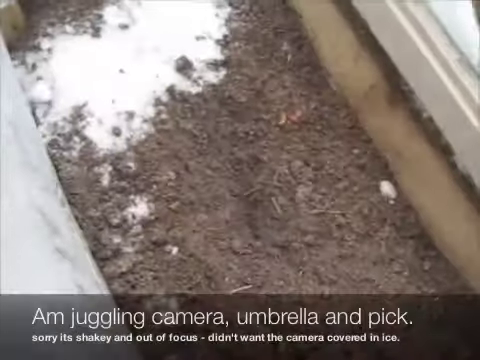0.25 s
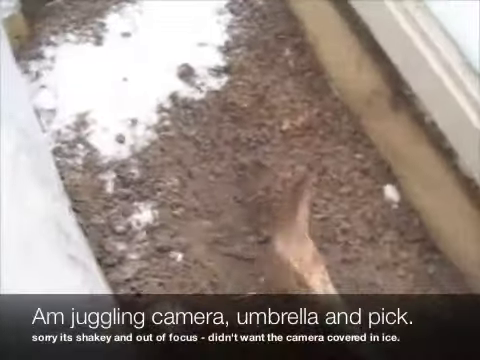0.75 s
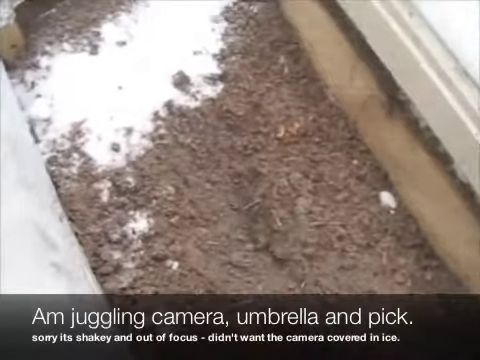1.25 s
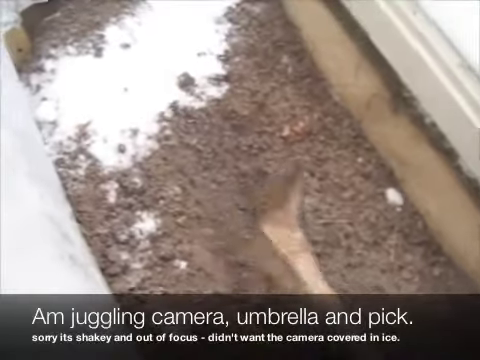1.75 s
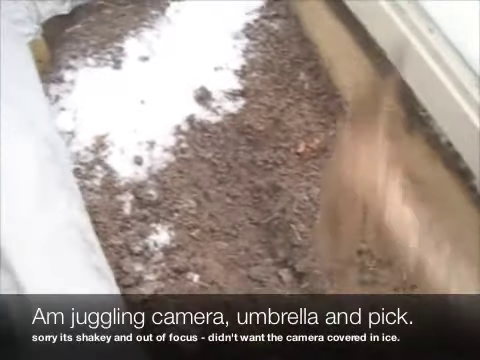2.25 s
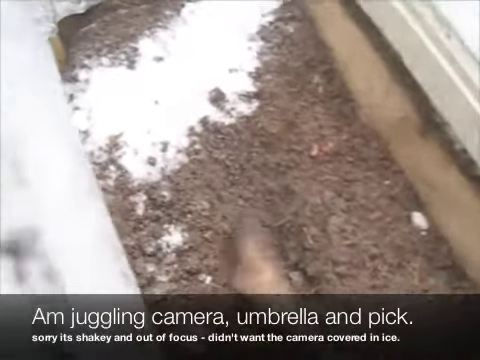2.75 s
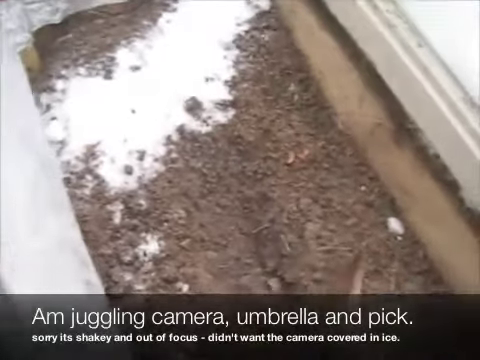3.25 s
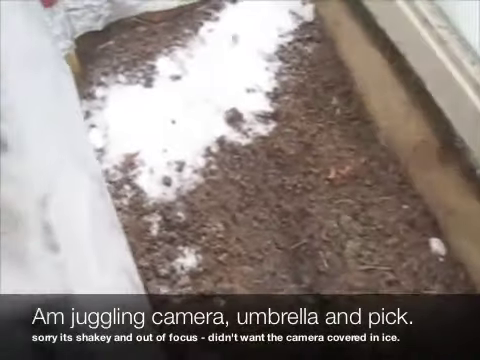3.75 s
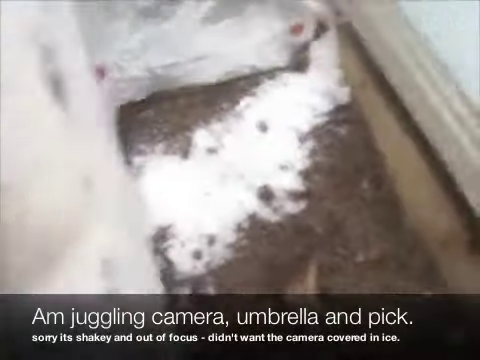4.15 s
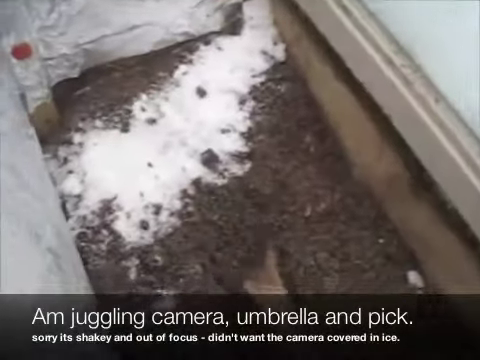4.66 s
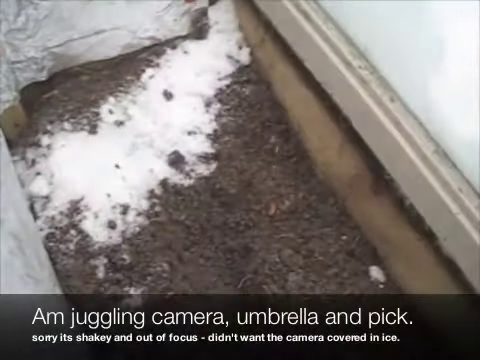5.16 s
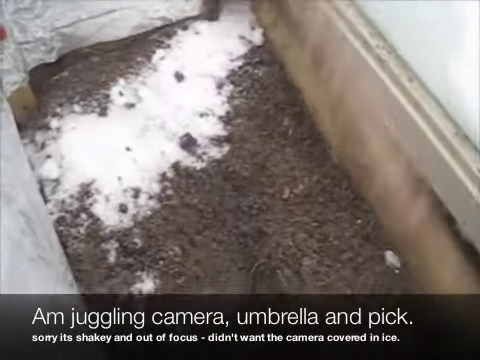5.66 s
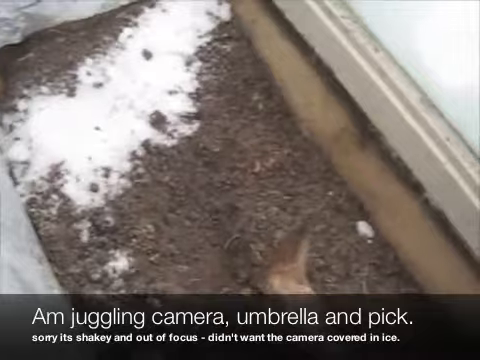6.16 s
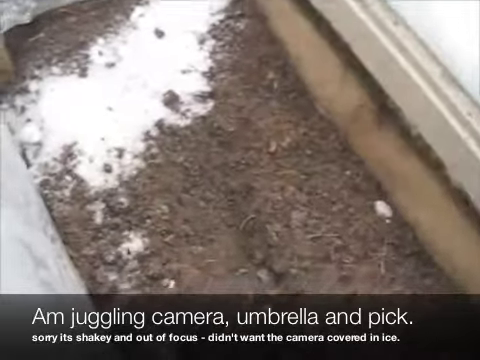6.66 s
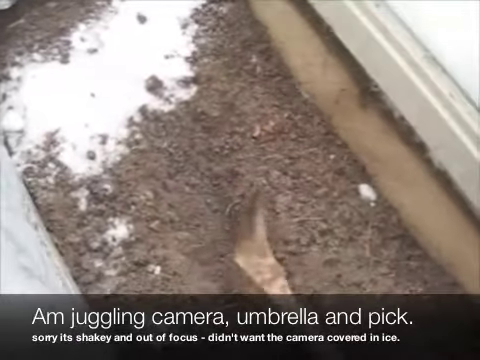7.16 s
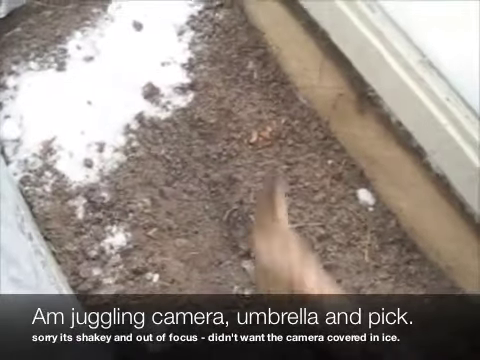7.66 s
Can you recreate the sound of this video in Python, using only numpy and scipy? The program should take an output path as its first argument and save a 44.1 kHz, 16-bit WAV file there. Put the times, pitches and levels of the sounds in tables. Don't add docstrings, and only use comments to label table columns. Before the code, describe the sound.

Outdoors in a garden bed, dense sleet ticks and pops on taut umbrella fabric just above a small handheld camera. A steel pick hits frozen soil six times, each a sharp crack with a brief dull ring and thump. Between blows the blade pries and scrapes through grit, and thrown clods rattle on sheeting. The patter drops after hard hits, then recovers.

```python
import sys
import numpy as np
from scipy import signal
from scipy.fft import rfft, irfft
from scipy.io import wavfile
from scipy.ndimage import map_coordinates

SR = 44100
rng = np.random.default_rng(int(sys.argv[2]) if len(sys.argv) > 2 else 0)


def master(y):
    cut = np.clip(np.atleast_2d(y).T, -1, 1)
    pcm = np.round(cut * 32767)
    wavfile.write(sys.argv[1], SR, pcm.astype(np.int16))


def to_linear_factor(level_db):
    exponent = np.asarray(level_db, float) / 20
    return 10 ** exponent


N = 348831

# pitch_hz, level_db, t60_s (time to fade by 60 dB)
STEEL = [(2830, 0, .03), (3600, -3, .025), (5950, -12, .025), (7600, -11, .02), (9870, -10, .025)]
# pitch_hz, level_db, t60_s
HEAD = [(1450, -1, .085), (4290, -7, .08), (6000, -10, .055)]
# frequency_hz, level_db (per Hz)
CRACK = [(350, -25), (600, 6.5), (2720, 7.5), (3690, 6.5), (5010, 0.5), (5830, 5), (13400, -11.5),
         (16500, -42)]


def unit(x):
    return x / np.sqrt(np.mean(x ** 2) + 1e-20)


def curves(rows):
    times, *columns = np.transpose(rows)
    t = np.arange(N) / SR
    return [np.interp(t, times, column, left=-150, right=-150) for column in columns]


def swell(s, db, rise, hold, fall):
    held = s + hold
    return to_linear_factor(curves([(s - rise, db - 25), (s, db), (held, db), (held + fall, db - 25)])[0])


def coloured(x, spectrum, keep_level=False):
    f, db = np.transpose(spectrum)
    hz = np.fft.rfftfreq(4096, 1 / SR)
    gain = to_linear_factor(np.interp(np.log(hz + 1), np.log(f), db))
    cepstrum = irfft(np.log(gain + 1e-5))
    cepstrum[1:2048] *= 2
    cepstrum[2049:] = 0
    response = irfft(np.exp(rfft(cepstrum)))
    if not keep_level:
        response = response / np.linalg.norm(response)
    return signal.oaconvolve(x, response)[:len(x)]


def add(track, s, sound):
    part = track[round(s * SR):][:len(sound)]
    part += sound[:len(part)]


def burst(t60, rise, parts=6, bend=1):
    t = np.arange(SR // parts) / SR
    fade = to_linear_factor(-60 * (t / t60) ** bend)
    return rng.standard_normal(len(t)) * fade * (1 - np.exp(-t / rise))


def ringing(modes, spread_db):
    t = np.arange(SR // 6) / SR
    rise_s = 0.00043
    out = np.zeros(len(t))
    for hz, db, t60 in modes:
        strength_db = db + spread_db * rng.normal()
        out += to_linear_factor(strength_db - 60 * t / t60) * np.sin(2 * np.pi * hz * t)
    return (1 - np.exp(-t / rise_s)) * out


def sparse(rate, spread_db):
    chance, size = rng.random((2, N))
    return (chance < rate / SR) * to_linear_factor(-spread_db * np.log(size + .02))


def rumble():
    # peak_s, level_db
    jolts = [
        (.62, -67),
        (1.81, -60.5),
        (2.7, -57.5),
        (3.01, -67),
        (3.96, -40.5),
        (4.76, -49),
        (6.9, -57),
    ]
    # frequency_hz, level_db (per Hz)
    sway_colour = [(12, -41), (20, 5), (160, -0.5), (210, -51), (350, -120)]
    level = to_linear_factor(-75)
    for s, db in jolts:
        level = level + swell(s, db, rise=0.052, hold=0, fall=0.11)
    return level * unit(coloured(rng.standard_normal(N), sway_colour))


def sleet_db():
    # time_s, level_db
    fall = [(0, -47.5), (.2, -57.5), (.55, -48.5), (1.4, -53.5), (2.1, -52.5), (2.6, -48.5), (3.2, -44.5),
            (3.9, -46.5), (4.45, -49), (4.89, -44.5), (5.77, -49.5), (6.63, -48.5), (7.2, -42.5),
            (7.91, -45)]
    # start_s, depth_db
    ducks = [
        (.457, 7.5),
        (1.479, 15),
        (2.681, 10.5),
        (5.791, 17.5),
        (6.884, 7.5),
    ]
    attack_s, recover_s = 0.021, 0.77
    starts, depths = np.array(ducks)[:, :1], np.array(ducks)[:, 1:]
    since = np.maximum(np.arange(N) / SR - starts, 0)
    dips = depths * (1 - np.exp(-since / attack_s)) * np.exp(-since / recover_s)
    return curves(fall)[0], dips.sum(axis=0)


def pellet(size):
    t = np.arange(SR // 16) / SR
    dent = np.exp(-((t - .0004) / (0.0001 * size)) ** 2)
    rebound = np.exp(-((t - .0004 - 0.00057 * size) / (0.00024 * size)) ** 2)
    push = 0.9 * rebound - dent
    echoes = rng.standard_normal(len(t)) * to_linear_factor(-60 * (t / 0.041) ** 1.39)
    echoes *= np.clip(t / 0.0015 - 1, 0, 1)
    return push + np.convolve(0.23 * echoes / np.linalg.norm(push), push[:100])[:len(t)]


def patter():
    # frequency_hz, level_db (per Hz)
    fabric = [(71, -33), (120, -21.5), (529, 2), (735, -3.5), (1710, -1), (2190, -9), (3380, -6),
              (14300, -25.5), (15500, -39), (16500, -60.5)]
    # frequency_hz, level_db (per Hz)
    far_colour = [(240, -7), (941, -16.5), (1530, -7.5), (4400, -10.5), (15000, -21.5), (15700, -34),
                  (16500, -61.5)]
    fall_db, dip_db = sleet_db()
    drops_db = fall_db - dip_db
    hiss_db = -56.5 + 0.79 * (fall_db - fall_db.mean()) - 0.87 * dip_db

    pushes, ticks = np.zeros(N), np.zeros(N)
    for _ in range(10):
        hits = sparse(rate=20, spread_db=1.9)
        size = 0.72 * np.exp(0.34 * rng.normal())
        pushes += signal.oaconvolve(hits, pellet(size))[:N]
        ticks += hits * rng.random(N)
    tick_fade = to_linear_factor(-60 * np.arange(SR // 16) / SR / 0.022)
    ticks = signal.oaconvolve(ticks, tick_fade)[:N]
    ticks = unit(coloured(ticks * rng.standard_normal(N), fabric))
    hiss = coloured(rng.standard_normal(N), far_colour)
    drops = to_linear_factor(-1.0) * unit(pushes) + to_linear_factor(-1.0) * ticks
    return to_linear_factor(drops_db) * drops + to_linear_factor(hiss_db + 3.0) * hiss


def near_sleet(*kinds):
    hard_above_db = -13
    low, soft, hard = np.zeros((3, N))
    for drops, tick_db in kinds:
        ticks = hard if tick_db > hard_above_db else soft
        for s, db in drops:
            add(low, s, to_linear_factor(db + 3.5) * pellet(size=np.exp(0.15 * rng.normal())))
            t60 = 0.039 * np.exp(0.32 * rng.normal())
            tick = burst(t60, rise=0.0013, parts=10, bend=1.416)
            add(ticks, s, to_linear_factor(db + tick_db + 6.5) * tick)
    soft = coloured(soft, [(800, -1.5), (1600, 8.0), (3500, 5.5), (6000, 0.0), (16000, -21.5)])
    hard = coloured(hard, [(800, 2.0), (1800, 12), (4000, 7.0), (7500, 1.0), (16000, -18.5)])
    return low + soft + hard


def soil():
    # start_s, peak_db, centre_hz, t60_s
    rattles = [(0.933, -38, 8000, 0.021), (.782, -38, 5030, 0.022), (1.54, -43.5, 6000, 0.046),
               (1.617, -47, 6000, 0.16), (1.656, -44, 6440, 0.12), (0.6714, -37, 4090, 0.036),
               (0.7, -34, 4290, 0.02), (0.734, -41.5, 3620, 0.14), (1.6795, -34, 3600, 0.16),
               (1.73, -28, 2900, 0.083), (2.799, -32.5, 2900, 0.068), (3.159, -26, 4900, 0.017),
               (3.885, -26, 6450, 0.068), (4.095, -27, 6100, 0.088), (4.1086, -19, 5100, 0.062),
               (4.14, -21, 4420, 0.054), (4.153, -16.5, 3120, 0.022), (4.2097, -28, 5270, 0.034),
               (4.2383, -23, 4340, 0.025), (4.264, -22, 3970, 0.087), (4.2928, -19.5, 5250, 0.018),
               (4.3259, -30.5, 3430, 0.13), (4.44, -30, 4500, 0.062), (4.5747, -29.5, 3930, 0.046),
               (4.9562, -26.5, 3106, 0.056), (5.089, -31.5, 4200, 0.11), (5.543, -35, 3600, 0.038),
               (6.4197, -33.5, 2958, 0.046), (7.256, -23, 6500, 0.039),
               (5.543, -26, 15000, 0.046), (5.978, -47, 8900, .04), (6.015, -37.5, 7400, 0.033),
                 (6.189, -38, 6000, 0.024), (3.959, -27, 4600, 0.079), (.107, -37, 9000, 0.021),
                 (0.23, -39.5, 9400, .03), (.605, -43, 7200, .04), (1.003, -39, 8300, 0.028),
                 (1.45, -40, 9000, 0.032), (2.239, -42, 11000, 0.042), (3.08, -34, 11900, 0.017),
                 (4.4078, -31.5, 11000, .012), (3.57, -43, 13000, 0.06), (3.55, -31, 5500, 0.054),
                 (4.063, -41, 9000, 0.039), (4.382, -28.5, 9000, 0.026), (4.704, -39, 9500, .03),
                 (5.061, -33, 7300, 0.049), (0.46, -13, 10000, 0.018), (7.024, -30, 5000, .04),
                 (7.045, -26, 4500, 0.069), (7.08, -33, 6000, .05), (7.113, -22.5, 3200, 0.063),
                 (7.219, -41, 6900, 0.045), (7.282, -30.5, 7100, 0.043), (5.7913, -12, 13500, 0.018),
                 (7.545, -34, 7100, 0.023), (1.4783, -11, 11000, .014), (8, -37, 9000, 0.037)]
    # full_level_s, level_db, rise_s, hold_s, fall_s
    showers = [
        (4.136, -40, .016, 0.028, 0.38),
        (6.996, -34.5, 0.0047, 0.13, 0.32),
    ]
    # frequency_hz, level_db (per Hz)
    grit = [(350, -101), (600, -16), (1630, -2.5), (2470, 1), (9220, -5), (15200, -15), (15800, -24),
            (16500, -57)]
    # frequency_hz, level_db
    sheet = [(9000, 0), (16000, -8.5)]
    lumps = np.zeros(N)
    for s, db, hz, t60 in rattles:
        colour = [(hz / 20.0, -24), (hz / 1.9, -4), (hz, 0), (hz * 2.17, -8), (hz * 6, -16)]
        add(lumps, s, to_linear_factor(db - 3.0) * coloured(burst(t60, rise=0.0012), colour))
    level = sum(swell(*row) for row in showers)
    grain_fade = to_linear_factor(-60 * np.arange(SR // 16) / SR / 0.031)
    grains = signal.oaconvolve(sparse(rate=2200, spread_db=3), grain_fade)[:N]
    shower = level * unit(coloured(grains * rng.standard_normal(N), grit))
    return coloured(lumps, sheet, keep_level=True) + shower


def scrape():
    # peak_s, level_db, rise_s, fall_s, dulling_db_per_khz
    strokes = [
        (.672, -58, 0.01, 0.066, 4),
        (1.828, -46.5, 0.065, 0.0069, -0.4),
        (2.996, -45.5, 0.013, 0.02, 0),
        (4.751, -41, 0.085, 0.0095, 1.5),
        (4.978, -46, 0.021, 0.043, -2),
        (6.107, -58, 0.081, 0.017, 0.5),
    ]
    out = np.zeros(N)
    for s, db, rise, fall, dull in strokes:
        grains = sparse(rate=1200, spread_db=5) * rng.standard_normal(N)
        slips = swell(s, db, rise, 0, fall) * unit(grains)
        modes = [(hz, level - dull * hz / 1000, t60) for hz, level, t60 in STEEL]
        blade = ringing(modes, spread_db=2) + to_linear_factor(-19) * ringing(HEAD, spread_db=4)
        out += signal.oaconvolve(slips, blade / np.linalg.norm(blade))[:N]
        crunch = coloured(burst(0.013, rise=0.00012)[:SR // 40] / 8, CRACK)
        add(out, 0, to_linear_factor(1) * signal.oaconvolve(slips, crunch))
    return to_linear_factor(10.5) * out


def ground(low_t60, mid_t60):
    low_colour = [(50, -14.5), (110, 7.5), (170, -6.0), (300, -37), (3000, -73.0)]
    mid_colour = [(90, -18.0), (180, -5), (450, -11.0), (900, -32.5), (5000, -58)]
    low = coloured(burst(low_t60, rise=0.0047), low_colour)
    mid = coloured(burst(mid_t60, rise=0.00086), mid_colour)
    t = np.arange(len(low)) / SR
    start_hz, end_hz, sink_s = 213, 73, 0.027
    hz = end_hz + (start_hz - end_hz) * np.exp(-t / sink_s)
    slide = np.sin(2 * np.pi * np.cumsum(hz) / SR)
    slide *= to_linear_factor(-60 * t / .14) * (1 - np.exp(-t / .004))
    return 1.8 * low + 5 * mid + 1.6 * slide


def blows():
    # start_s, then four level_db
    strikes = [
        (0.457, -25, -22, -38, -16),
        (1.479, -42, -18, -11.5, -8),
        (2.6792, -16, -12, -4, -28),
        (3.9493, -18, -16, -18, -41),
        (4.7512, -30, -39, -35, -33),
        (5.7909, -12, -39, -9, -9.5),
        (6.885, -15, -35, -14, -9),
    ]
    # pitch_hz, level_db, t60_s
    shank = [
        [(1296, 6, 0.019), (1720, 2, 0.028)],
        [(2167, -10.5, 0.037), (2737, 9.5, 0.021)],
        [(3682, 4.5, 0.01), (3960, -22, 0.011), (4073, 6, 0.012)],
        [(5100, -27, 0.012), (5940, -6, 0.022), (6960, 6.5, 0.0073), (7700, 6, 0.0029)],
    ]
    # start_s, level_db, pitch_hz, t60_s
    knocks = [(.67, -44, 4160, 0.063), (.702, -47, 4320, 0.055), (0.769, -35.5, 174, 0.15),
              (.85, -55, 4250, 0.089), (1.832, -48, 4300, 0.14), (2.684, -38, 5990, 0.11),
              (3.002, -35.5, 4235, 0.077), (3.943, -19.5, 165, 0.084), (4.89, -34, 246, 0.15),
              (3.9346, -19.5, 810, 0.0084), (0.456, -20, 550, 0.021), (.458, -23, 2300, 0.069),
              (.533, -24, 3850, 0.022), (0.535, -33, 2990, .05), (1.479, -16, 533, 0.042),
              (2.68, -17, 740, 0.047), (2.68, -27, 4310, .012), (2.681, -25, 255, 0.05),
              (3.886, -34, 3490, 0.065), (3.948, -22.5, 702, 0.066), (3.948, -17, 1190, 0.024),
              (4.703, -43, 9850, 0.05), (5.792, -17, 5840, 0.031), (5.794, -31, 3600, 0.039),
              (6.886, -29, 5940, 0.071), (6.8835, -19, 9900, 0.021), (1.48, -24, 3520, 0.036),
              (.445, -22, 12200, .02), (4.668, -49, 9900, 0.05), (.77, -23.5, 2840, 0.031),
              (.77, -31, 3560, 0.037), (2.99, -45, 2930, .03), (2.991, -44, 3590, 0.027),
              (0.489, -53, 4320, .12), (5.791, -2.5, 3474, 0.017), (1.526, -37, 2900, 0.032),
              (4.722, -17, 526, 0.051), (4.723, -24, 2680, .03), (4.724, -21, 1370, 0.048),
              (4.73, -22, 3550, 0.034), (4.737, -23, 4250, 0.042), (4.743, -27, 3000, 0.038),
              (4.747, -24, 1374, 0.052), (4.7545, -26, 1670, 0.02), (4.722, -36, 9850, 0.04),
              (5.7915, -17, 1050, 0.025)]
    out = np.zeros(N)
    for s, *family_db in strikes:
        for db, modes in zip(family_db, shank):
            add(out, s, to_linear_factor(db) * ringing(modes, spread_db=6.5))
    for s, db, hz, t60 in knocks:
        add(out, s, ringing([(hz, db, t60)], spread_db=0))
    return out


def pick():
    # start_s, crack_peak_db, then relative to it
    # thud_db, tip_ring_db, head_ring_db
    swings = [(0.446, -22, -18, 7, -17), (.453, -20, -20, 10.5, -40), (0.4561, -5, -22, -30, -15.5),
              (1.476, -20, -25.5, -4, -25), (1.4781, -5.5, -22, -10, -46), (2.6744, -39, -32, -5, -24),
              (2.6795, -6.5, -24, -37, -27), (3.931, -32, -10, -16, -5), (3.943, -22, -40, -15, -24),
              (3.947, -27, -6.5, -15, -20), (3.9494, -23.5, -6, -25, -6.5), (5.7874, -35, -10, -26, -41),
              (5.791, -5.5, -27.5, -11.5, -34), (6.88, -33, -26, -10, -27), (6.8839, -21, -30, 3, -24),
              (6.885, -9.5, -25.5, -28, -35), (6.899, -28, -27, 0, -26)]
    taps = [(0.482, -39, 8, -21, -29), (0.532, -27.5, -10.5, -26, -13), (0.562, -33, -33, -3, -17),
            (.77, -32, -12, -10, -15), (1.515, -41, -5.5, -5, -29), (1.803, -44, -5.5, 12, -7),
            (1.818, -46.5, -5, -3, -22), (1.829, -40, -18, 11, -11), (2.989, -32, -10.5, -12, -10),
            (4.721, -31, -3.5, -24, -8), (4.7306, -24.5, -14, -19, -28), (4.743, -29.5, -12, -15, -20),
            (4.751, -28.5, -14.5, -20, -26), (4.897, -53, 10, -20, -32), (4.975, -35, -9.5, -8, -20)]
    # pitch_hz, level_db, t60_s
    thud = [(246, 3.5, 0.098), (526, 12.5, 0.061), (750, -1, 0.03)]
    crack, body = np.zeros(N), np.zeros(N)
    for s, db, thud_db, tip_db, head_db in swings + taps:
        crack_t60 = min(0.024 - 0.0032 * (db + 8.0), .036)
        add(crack, s, to_linear_factor(db + 3.0) * burst(crack_t60, rise=0.00031))
        add(body, s, to_linear_factor(db + min(tip_db, 12)) * ringing(STEEL, spread_db=2))
        add(body, s, to_linear_factor(db + head_db - 1.0) * ringing(HEAD, spread_db=5))
        thump = to_linear_factor(-1.0) * ringing(thud, spread_db=4.5) + ground(low_t60=0.1, mid_t60=0.043)
        add(body, s, to_linear_factor(db + thud_db - 8.5) * thump)
    return coloured(crack, CRACK) + body


def frame(x):
    tail = coloured(burst(.09, rise=0.0016), [(700, -3.5), (2500, 2), (9000, -9.5)])
    grip_db, grip_per_s = 1.2, 160
    grip = map_coordinates(rng.standard_normal(N // 100), [np.arange(N) * grip_per_s / SR])
    scatter = signal.oaconvolve(x, tail / np.linalg.norm(tail))[:N]
    return x * to_linear_factor(grip_db * grip) + to_linear_factor(-27) * scatter


def scene():
    # start_s, push_peak_db
    wet = [(0.1137, -39), (0.1452, -40.5), (0.4199, -35), (0.9824, -50), (1.1163, -44), (1.9321, -37),
           (2.0185, -38), (2.135, -38.5), (2.168, -27), (2.18, -34), (2.1966, -38.0), (2.2039, -34.5),
           (2.2964, -35), (2.3518, -26.5), (2.43, -33.5), (2.4763, -35.5), (2.5234, -29.0), (2.8678, -40),
           (3.0205, -38), (3.0308, -36), (3.1138, -37), (3.1606, -37), (3.173, -36.5), (3.3191, -38.5),
           (3.4989, -31.5), (3.5819, -40), (3.6757, -31.0), (3.7637, -32.5), (3.7804, -35), (3.8466, -36),
           (4.0079, -33), (4.2806, -29), (4.5873, -33), (5.2908, -38.5), (5.324, -31.5), (5.3355, -25.5),
           (5.3428, -28), (5.4044, -37), (5.5647, -31.5), (5.6054, -40), (5.6225, -44), (5.656, -35.5),
           (5.9112, -48.5), (5.9948, -50.5), (6.0609, -46), (6.1147, -38.5), (6.1596, -41.5), (6.2645, -36),
           (6.3576, -40.5), (6.461, -35), (6.745, -30.5), (6.8171, -24.0), (7.3028, -40), (7.4639, -40),
           (7.5516, -34), (7.5754, -34), (7.5899, -33.5), (7.6548, -30.5), (7.7038, -31), (7.86, -31.5)]
    # start_s, push_peak_db
    damp = [(0.0389, -38), (0.0877, -37.5), (0.1229, -32.5), (0.8324, -37.5), (0.8732, -41), (1.0761, -40),
            (1.0928, -36.5), (1.1616, -43), (1.4137, -41.0), (1.4434, -34), (2.1571, -24.5),
            (2.2597, -27.5), (2.3305, -39), (2.3684, -37), (2.4034, -50), (2.4993, -26.5), (2.6553, -42),
            (2.8296, -41.5), (3.2255, -31.5), (3.4037, -35), (3.4673, -26), (3.7326, -39), (4.1788, -28),
            (4.3361, -27.5), (4.4788, -29.5), (4.6346, -31.0), (4.9239, -27.5), (5.0297, -26),
            (5.1355, -38), (5.2747, -31.5), (5.4213, -31.0), (5.5097, -35.0), (5.5978, -29.5),
            (6.0407, -39), (6.1368, -40), (6.2169, -47), (6.402, -32.5), (6.4282, -36.5), (6.4367, -23.0),
            (6.5211, -36), (6.5597, -34), (6.5808, -33.5), (6.6406, -30.5), (6.6617, -29), (6.6868, -26),
            (6.7043, -32.5), (7.3109, -35), (7.3766, -30), (7.4841, -38), (7.4944, -34)]
    # start_s, push_peak_db
    slush = [(0.0159, -40), (0.4051, -31.5), (0.9594, -51), (1.1723, -39.5), (1.1887, -38), (1.2327, -38.5),
             (1.2789, -40.5), (1.4027, -35.0), (1.96, -48.5), (2.1882, -31), (2.2774, -35), (2.2851, -28),
             (2.3834, -29.5), (2.4568, -37), (2.5698, -38), (2.5771, -36.5), (2.5982, -35.5), (2.6405, -29),
             (2.9192, -48.5), (2.9303, -50.5), (3.2136, -46), (3.2774, -39), (3.3064, -35), (3.3288, -34),
             (3.3626, -38.0), (3.3728, -35), (3.3899, -32.5), (3.5656, -30.5), (3.5975, -37.0),
             (3.6535, -37), (3.8371, -36), (4.0367, -34.5), (4.0854, -38), (4.4304, -36), (4.5455, -34),
             (4.5639, -36), (4.6471, -25.5), (4.8051, -42), (4.8373, -32), (4.8822, -32), (5.012, -21.5),
             (5.1119, -28.5), (5.2181, -34), (5.234, -33.5), (5.4948, -28.5), (5.7067, -29),
             (6.0502, -39.5), (6.23, -51), (6.2429, -44.0), (6.3383, -54), (6.6213, -32.5), (6.738, -29),
             (7.4305, -42), (7.4517, -30.5), (7.564, -36), (7.6151, -52), (7.6326, -32), (7.6763, -37),
             (7.7399, -34.5), (7.7861, -33.5)]
    # start_s, push_peak_db
    graupel = [(0.281, -41.0), (0.3359, -35.5), (1.0599, -50), (1.1066, -38.5), (1.1354, -35.5),
               (1.3846, -39), (2.0036, -34), (2.3215, -44), (2.6159, -41.5), (3.1442, -42), (3.2407, -29.5),
               (3.6682, -36), (3.6882, -39), (3.7189, -34), (3.7488, -36.0), (3.801, -36), (3.8685, -50),
               (5.3562, -34), (5.4542, -38.5), (5.6703, -33.5), (5.7532, -34), (5.8658, -44),
               (5.9222, -44.5), (5.98, -41), (6.1523, -43), (6.2061, -44.5), (6.3143, -51), (6.4512, -33.0),
               (6.5093, -43), (6.5364, -34), (7.4094, -33.5), (7.6692, -47), (7.8221, -32.5), (7.8742, -41),
               (7.8844, -28.5)]
    # start_s, push_peak_db
    ice = [(0.0771, -45), (0.1913, -40), (0.3142, -41.5), (0.3605, -40), (0.7017, -41), (0.9112, -47),
           (0.933, -49), (1.214, -47), (1.61, -57), (1.9135, -40), (2.0439, -43.5), (2.1239, -45),
           (2.4897, -35), (2.6334, -43), (3.1881, -46), (3.4149, -41.0), (3.4885, -46), (4.1078, -32),
           (4.2627, -32.5), (4.5764, -36.5), (4.6001, -34), (4.7143, -29.5), (4.8975, -31), (5.6394, -33),
           (5.7605, -35.5), (5.8879, -51), (6.3057, -47), (6.6532, -27), (6.756, -38), (6.8093, -38.5),
           (6.8338, -40), (6.8412, -31), (7.2581, -32.5), (7.5421, -38.5), (7.7181, -39)]
    # frequency_hz, level_db
    mic = [(30, -15), (100, -10.5), (220, -2)]
    sleet = near_sleet((wet, -22), (slush, -15), (graupel, -12.5), (ice, -11.5)) + patter()
    sleet += near_sleet((damp, -19))
    steel = frame(pick() + blows())
    through_air = sleet + steel + scrape() + soil()
    return (rumble() + coloured(through_air, mic, keep_level=True))[None]


def top_cut(x):
    return signal.sosfilt(signal.butter(12, 16700, fs=SR, output="sos"), x)


def record(dry):
    # frequency_hz, level_db
    edge = [(15600, 0), (15950, -22), (16700, -34), (16900, -95)]
    noisy = dry[0] + to_linear_factor(-79) * rng.standard_normal(N)
    ceiling = noisy / (1 + np.abs(noisy / .7) ** 6) ** (1 / 6)
    mix = coloured(ceiling, edge, keep_level=True)[None]
    return top_cut(mix)


dry = scene()
out = record(dry)
master(out)
```